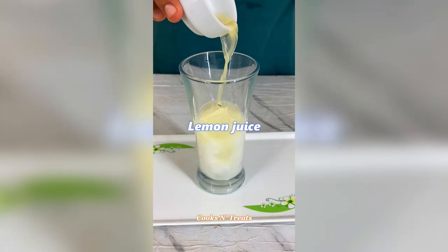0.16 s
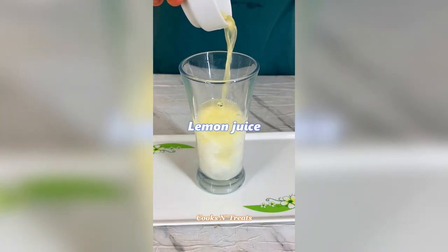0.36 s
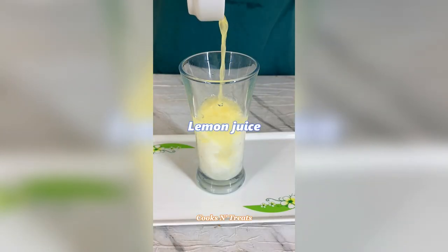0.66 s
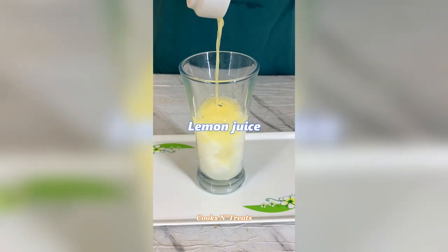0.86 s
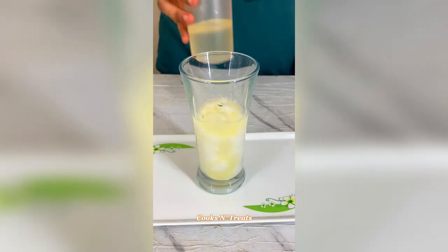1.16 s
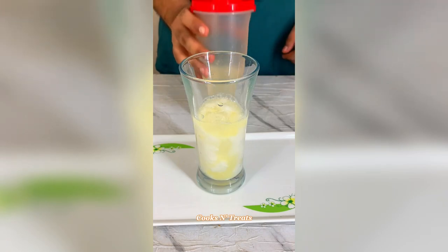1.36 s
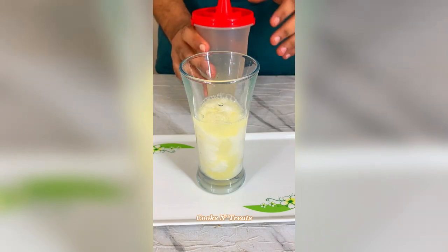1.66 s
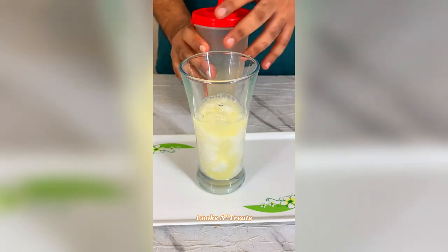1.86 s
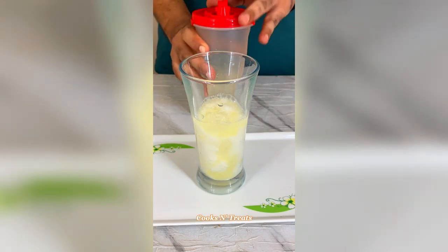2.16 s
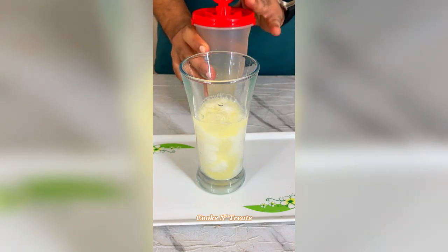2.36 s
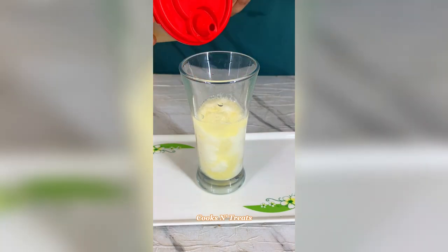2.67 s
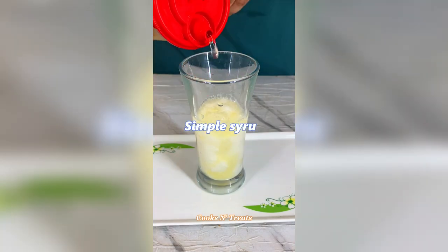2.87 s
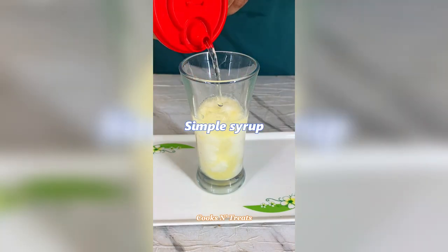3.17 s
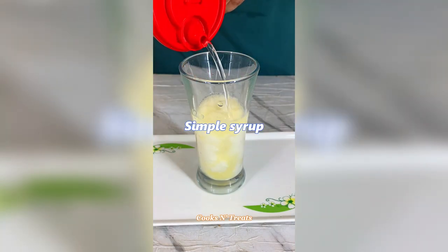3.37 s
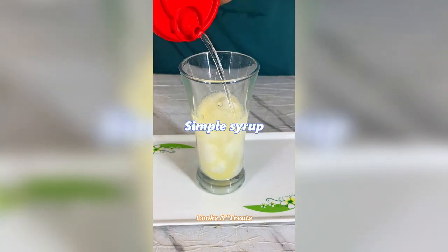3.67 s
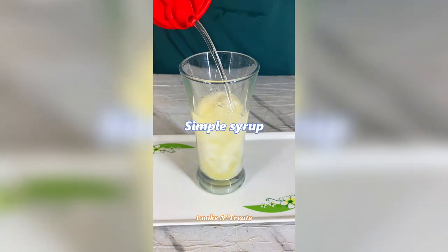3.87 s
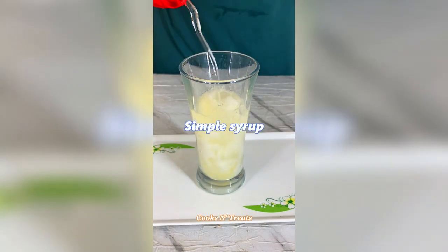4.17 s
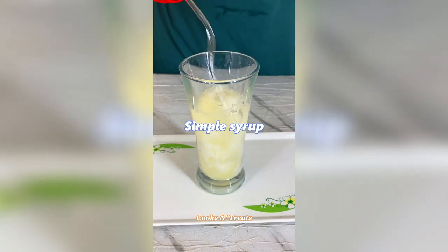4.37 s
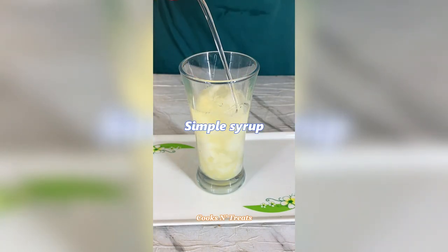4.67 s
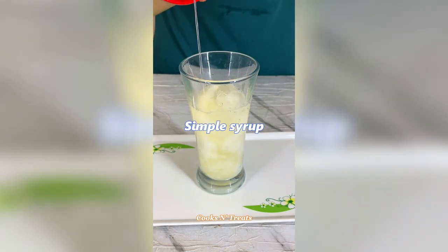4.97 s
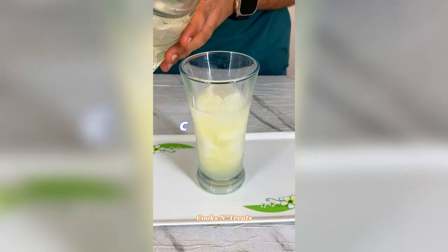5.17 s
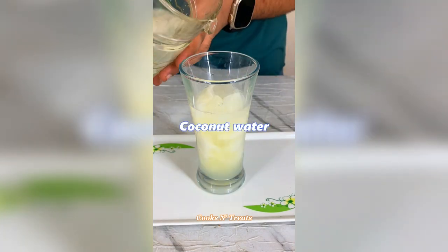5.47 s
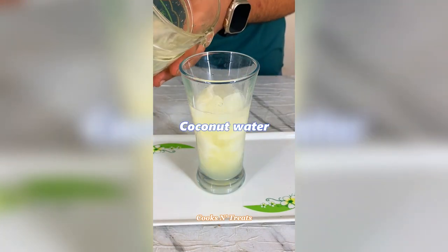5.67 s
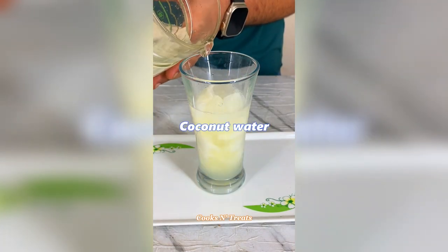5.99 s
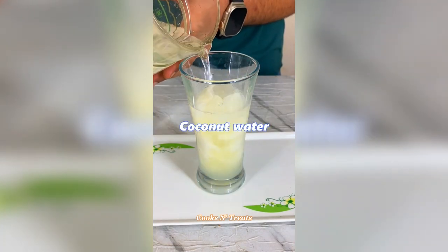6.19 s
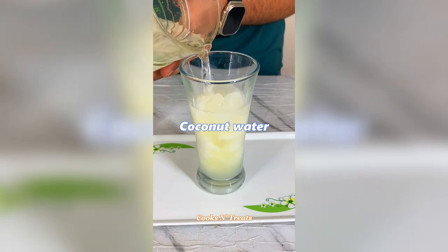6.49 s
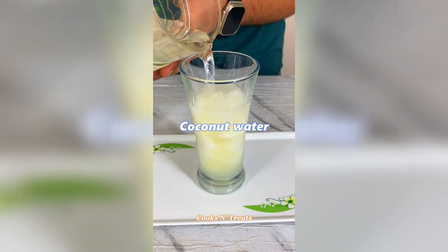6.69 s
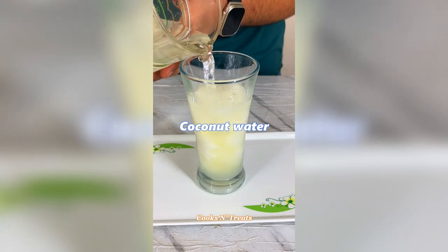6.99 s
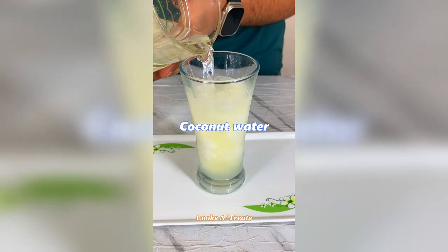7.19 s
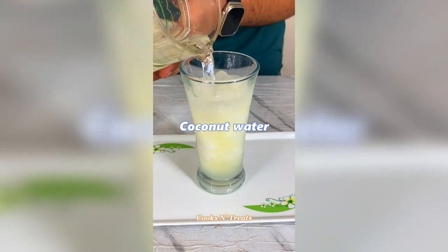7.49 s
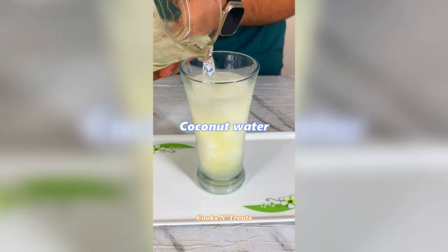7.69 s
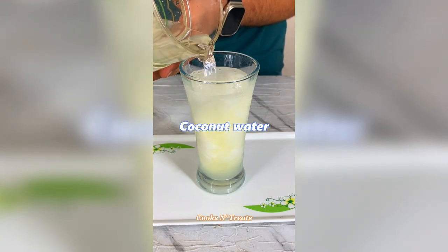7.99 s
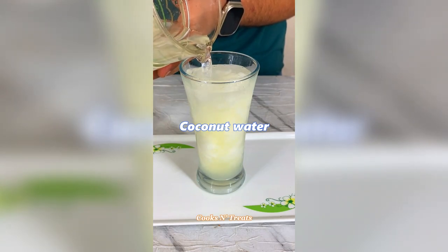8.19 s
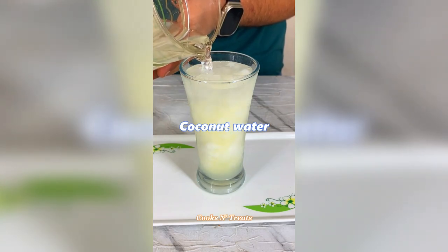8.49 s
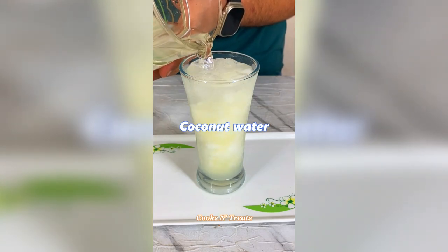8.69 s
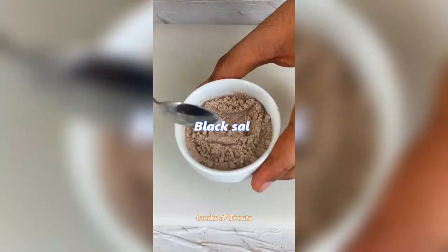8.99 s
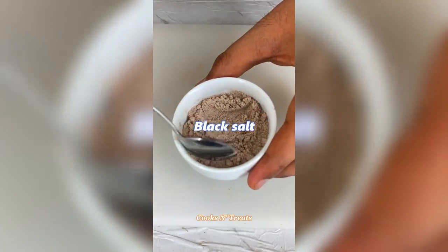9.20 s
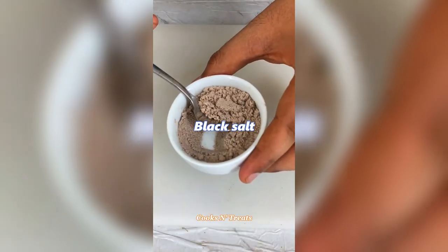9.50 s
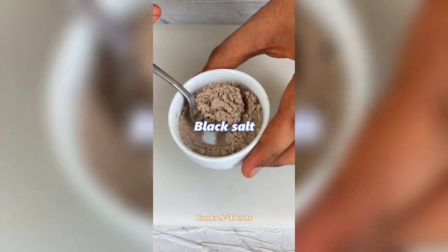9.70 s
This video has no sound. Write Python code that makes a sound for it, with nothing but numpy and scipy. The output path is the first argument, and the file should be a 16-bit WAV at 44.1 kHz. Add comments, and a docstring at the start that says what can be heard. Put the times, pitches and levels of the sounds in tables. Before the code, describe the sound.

Lemon juice gurgles onto ice in a glass, containers knock the table, faint syrup and coconut water trickles follow, then a spoon squeals on china.

```python
"""Lemon juice gurgles onto ice in a tall glass, then syrup and coconut water: ringing bubbles, splash and fizz.
Drops snap and ring in the glass, and containers knock on the table, setting off its modes and the room.
Shaped noise makes a quiet room with a thin high hiss. After a silence a steel spoon touches a china bowl
and squeals along its rim on gliding bending modes, digging into grains of salt."""
import sys
import numpy as np
from scipy import signal
from scipy.fft import rfft, irfft
from scipy.io import wavfile
from scipy.ndimage import uniform_filter1d

SR = 44100
rng = np.random.default_rng(int(sys.argv[2]) if len(sys.argv) > 2 else 0)


def waveform_to_disk(signal):
    """Save audio, clipped to [-1, 1], as 16-bit WAV at the path in sys.argv[1]."""
    frames = np.transpose(np.atleast_2d(signal))
    scaled = np.clip(frames, -1, 1) * 32767
    samples = np.round(scaled).astype(np.int16)
    wavfile.write(sys.argv[1], SR, samples)


N = 434385

# The pours as they run, before the overall trims. Each row: time in seconds, gurgle level in dB,
# spray level in dB, central bubble pitch in Hz.
LEMON_POUR = [(0, -61, -59, 1950), (0.14, -65.5, -58.5, 1600), (0.2, -51.5, -75, 1374),
              (0.37, -58, -69, 1073), (0.47, -64.5, -71, 2740), (0.72, -79.5, -79, 2430),
              (0.9, -104, -83, 3400), (1.15, -102, -86, 3020)]
SYRUP_POUR = [(3.7, -80, -84, 2950), (3.9, -77, -88, 2600), (4.02, -62, -86, 1790), (4.15, -74, -86, 3040),
              (4.36, -62, -80, 3320), (4.5, -71, -56, 2210), (4.68, -58.5, -58.5, 2000),
              (4.84, -86.5, -97, 2190), (5.1, -61.5, -80, 1906)]
COCONUT_POUR = [(6.4, -83, -91, 3480), (6.62, -70, -85, 2800), (7.0, -82, -85, 2140),
                (7.15, -70, -100, 2006), (7.8, -72, -73, 2400), (8.2, -87.5, -95, 2160),
                (8.5, -64, -89, 2580), (8.7, -70, -96, 2400), (8.9, -98, -96, 2384)]
# How each pour falls, in that order. Each row: ring of a bubble in cycles, splash in dB against the bubbles,
# drumming of the table in dB against the gurgle.
POUR_STREAMS = [(6, -1, -1), (6, 0.5, -2), (6.4, -3.5, -14)]
# Density of the trapped bubbles, one entry a pour, in bubbles per second.
POUR_BUBBLES_PER_S = (320, 130, 80)
# Colour of the fine spray, also of the snap of a drop. Each row: frequency in Hz, relative level in dB per Hz.
SPRAY_COLOUR = [(300, -17), (800, -6.5), (1600, -13.5), (3500, 3.5), (5500, 1.5), (7500, 2), (10500, -8.5),
                (12000, -38), (15000, -48)]


def pours():
    """Each stream traps small bubbles, splashes on the ice, throws a fine spray and drums the table."""
    gurgle, spray, drumming = np.zeros((2, N)), np.zeros((2, N)), np.zeros(N)
    t = np.arange(N) / SR
    fizz = colour(patter(per_s=200, spread_db=5.0), SPRAY_COLOUR)
    splash_colour = [(100, 1), (500, 9), (1500, 4), (4000, -8.5), (6000, -5), (12000, -36)]  # Hz, dB per Hz
    splash = colour(patter(per_s=400, spread_db=5.5), splash_colour)

    liquids = (LEMON_POUR, SYRUP_POUR, COCONUT_POUR)
    for rows, bubbles_per_s, character in zip(liquids, POUR_BUBBLES_PER_S, POUR_STREAMS):
        cycles, splash_db, drum_db = character
        s, body_db, spray_db, hz = np.transpose(rows)
        inside = (t > s[0]) & (t < s[-1])
        bubbles = bubble_stream(s, hz, bubbles_per_s, cycles)
        flow = amp(np.interp(t[inside], s, body_db))
        drumming[inside] = amp(drum_db) * flow
        gurgle[:, inside] += (unit(bubbles[:, inside]) + amp(splash_db) * splash[:, inside]) * flow
        spray += fizz * inside * amp(np.interp(t, s, spray_db))

    # the stream comes in uneven gulps
    gulp_hz, gulp_db = 14, 2.2
    gulps = amp(gulp_db * (unit(wander(N, gulp_hz).real) - 0.34))
    water = amp(-2) * in_glass(gurgle, ring_db=-13) + amp(-2) * spray
    # the falling stream drums the table through the glass
    drum = cluster(t, hz=160, width_hz=90) * drumming
    return echo(gulps * water + drum, wet_db=-5)


def bubble_stream(s, hz, bubbles_per_s, cycles, scatter=0.204):
    """Bubbles of random time, pitch, size and pan crowd around the pour's central pitch."""
    out = np.zeros((2, N))
    duration = s[-1] - s[0]
    for when, pitch, size, pan in rng.random((int(duration * bubbles_per_s), 4)):
        at = s[0] + when * duration
        bubble_hz = np.interp(at, s, hz) * np.exp(scatter * (4 * pitch - 2))
        ring = bubble(bubble_hz, cycles, rise=0.018)
        add(out, at, amp(23.7 * size) * np.outer([.5 + pan, 1.5 - pan], ring))
    return out


def bubble(hz, cycles, rise):
    """A trapped bubble rings briefly and rises in pitch as it nears the surface."""
    t = np.arange(2600) / SR
    age = t * hz / cycles
    pitch = hz * (1 + rise * np.minimum(age, 3))
    return np.sin(2 * np.pi * np.cumsum(pitch) / SR) * np.exp(-age)


def patter(per_s, spread_db):
    """Random clicks of uneven size fall a little to the left or right."""
    size = amp(spread_db * np.minimum(rng.exponential(1, N), 3.5))
    size = size * (rng.random(N) < per_s / SR)
    pan = 1 + np.outer([1, -1], rng.uniform(-0.18, 0.41, N))
    return size * rng.choice([-1, 1], N) * pan


# Notes of the air above the drink. Each row: frequency in Hz, relative level in dB,
# t60 in seconds for a drop (doubled under the pours).
GLASS_AIR = [(1580, -6.5, 0.18), (1910, -6, 0.095), (2954, -1, 0.052), (3820, 5.5, 0.022)]


def in_glass(x, ring_db):
    """The air above the drink keeps ringing with whatever splashes in it."""
    t = np.arange(8000) / SR
    ring = 0
    for hz, db, t60 in GLASS_AIR:
        ring = ring + amp(db - 60 * t / (2 * t60)) * cluster(t, hz, 0.061 * hz)
    return x + amp(ring_db) * signal.oaconvolve(x, ring[None] / np.linalg.norm(ring))[:, :N]


# The clearest drops, bubbles and cracks of ice in the glass, before the overall trim. Each row: start in seconds,
# ring pitch in Hz, ring level in dB, snap level in dB.
GLASS_DROPS = [(0.051, 3480, -61, -65), (0.084, 1495, -50, -60), (0.136, 1410, -55.5, -58),
               (0.153, 1530, -46, -61), (0.163, 1467, -39.5, -57.5), (0.178, 1400, -42, -75),
               (0.229, 1435, -55, -57.5), (0.251, 1100, -49, -68), (0.3303, 1330, -55, -62.5),
               (0.358, 1096, -58, -56), (0.447, 4380, -61, -65), (0.5304, 3100, -64, -61),
               (0.618, 3720, -61.5, -80), (0.641, 3280, -67, -65), (0.706, 2630, -66.5, -78),
               (0.8893, 4800, -55.5, -60.5), (4.048, 1690, -64, -69), (4.119, 3970, -59, -69),
               (4.1844, 3560, -58, -47.5), (4.257, 3870, -50.5, -56), (4.3284, 3540, -53.5, -62),
               (4.3697, 3920, -54, -68), (4.4377, 5430, -56, -68), (4.5398, 3810, -55, -52.5),
               (4.569, 5200, -65, -55), (5.009, 1905, -53, -81), (5.0674, 1790, -55.5, -66),
               (5.0877, 1550, -56, -59.5), (6.403, 4030, -64.5, -74), (6.8029, 2120, -66, -76),
               (6.8373, 1590, -61.5, -69), (7.019, 6630, -62, -82), (7.102, 1824, -61, -73),
               (7.1693, 1670, -58, -69), (7.3177, 1894, -60, -75.5), (7.494, 1590, -63, -86),
               (7.657, 2710, -68.5, -73), (7.7267, 3536, -64, -72), (8.4876, 4330, -62, -67),
               (8.692, 2450, -61, -79)]


def drops():
    """Each drop or crack is a snap, a rough little ring, a dull plop and the note of the air in the glass."""
    out, t = np.zeros((2, N)), np.arange(12000) / SR
    snap_s, ring_s, plop_s = 0.0028, 0.0047, 0.015  # decay times
    plop_colour = [(60, -18), (200, 6), (900, -3), (2000, -13), (5000, -40)]  # Hz, dB per Hz
    for s, hz, ring_db, snap_db in GLASS_DROPS:
        snap = colour(pair(len(t), 0.2), SPRAY_COLOUR) * np.exp(-t / snap_s) * (1 - np.exp(-t / 0.00019))
        ring = cluster(t, hz, 0.11 * hz) * np.exp(-t / ring_s) * (1 - np.exp(-t / 0.00079))
        plop = colour(pair(len(t), 0.43), plop_colour) * np.exp(-t / plop_s) * (1 - np.exp(-t / 0.0011))
        glass = 0
        for glass_hz, db, t60 in GLASS_AIR:
            detuned_hz = glass_hz * rng.uniform(0.92, 1.04)
            glass = glass + amp(db - 60 * t / t60) * np.sin(2 * np.pi * detuned_hz * t)
        drop = at_level(snap, snap_db) + at_level(ring, ring_db)
        drop = drop + at_level(plop, ring_db - 15) + at_level(glass, ring_db - 17)
        add(out, s, echo(drop, wet_db=-1))
    return out * amp(-2)


# Blows on the table and its containers. Each row: start in seconds, level in dB before the band balance,
# tilt in dB from one band to the next higher, extra middle in dB of a hollow container, its low ring in Hz,
# low ring level in dB, its high ring in Hz, high ring level in dB, length as a factor on the decay.
TABLE_BLOWS = [(1.4929, -22, -6.6, 1, 429, -8, 1180, -15, 0.99),
               (2.1293, -44, -10, -2, 696, -3, 2520, 0, 1), (2.19, -62, 0.5, 0, 700, -8, 2600, -8, 1),
               (2.244, -37, .5, 4, 1000, 3, 3560, -8, 0.82), (2.307, -44.5, -8, 5, 345, 2, 1833, -3, .85),
               (4.459, -46, 0.5, -2, 898, -4, 1530, 1.5, 0.92),
               (4.618, -52.5, 1.7, 0, 1553, -3, 2890, 1, 0.75),
               (4.721, -62, -1, 10, 1515, -2, 3000, 3, 1.1),
               (6.0592, -49.5, -10.5, 1, 499, -3, 1503, -9, 0.79),
               (6.867, -47, -10.5, -1, 492, -3, 1553, -9, 0.88),
               (7.9622, -57, -11.5, 1, 490, -3, 1506, -12, .75)]
# The table's modes. Each row: frequency in Hz, relative level in dB, t60 in seconds before the length factor.
TABLE_MODES = [(55.3, -24, 1.3), (72, -24, 0.17), (92.66, -16, .85), (128, -17, .25), (144, -18.5, 0.53),
               (162.2, -9.5, 0.52), (218.7, -19.5, .55), (297, -15.5, .32), (346.5, -17.5, .37),
               (433.5, -12, .17), (494, -12, .3), (541, -21, .16), (796, -17.5, 0.18), (1083, -18, 0.074),
               (1496, -23.5, .25), (1605.4, -24, .2), (2480, -26, 0.12), (3270, -25, .16)]
# Colour of the burst of a blow. Each row: frequency in Hz, relative level in dB per Hz.
THUD_COLOUR = [(30, -32), (55, -10), (130, 1.5), (250, -6), (450, 0.5), (1000, -5), (2000, -13),
               (5000, -18.5), (7300, -34), (8500, -39.5), (11000, -46), (13000, -71.5)]
# Balance of an untilted blow, in dB: bass, low-mid, high-mid, treble.
BLOW_BALANCE = [-1.87, 2.5, 1.5, -3]


def knocks():
    """A blow is a short crack, the container's ring, the table's modes and the room's answer."""
    out, t = np.zeros((2, N)), np.arange(SR) / SR
    crack_s, ring_t60, width = .003, 0.2, 0.17  # s, s, ring width as a share of its pitch
    for s, level_db, tilt_db, hollow_db, low_hz, low_db, high_hz, high_db, length in TABLE_BLOWS:
        burst = colour(pair(SR, side=0.53), THUD_COLOUR)
        table = 0
        for hz, db, t60 in TABLE_MODES:
            mode = amp(db - 60 * t / (t60 * length)) * np.sin(2 * np.pi * hz * t)
            table = table + mode * rng.choice([-1, 1])
        container = amp(low_db) * cluster(t, low_hz, width * low_hz)
        container = container + amp(high_db) * cluster(t, high_hz, width * high_hz)

        # the louder the blow, the smaller its crack beside the body
        crack = amp(-17 - 0.3 * level_db) * burst * np.exp(-t / crack_s)
        blow = die_away(burst, length) + crack
        # the heavy table takes a few milliseconds to get moving
        blow = blow + amp(9) * table * (1 - np.exp(-t / 0.0063))
        blow = blow + container * amp(-60 * t / (ring_t60 * length))

        tilt = tilt_db * (np.arange(4) - 1.5)
        hollow = hollow_db * np.array([0, 1, 1, 0])
        band_db = level_db + tilt + hollow + BLOW_BALANCE
        add(out, s, weigh(blow * np.minimum(t / 0.00077, 1), band_db, size=1300))
    return out * amp([[-1.1], [1.1]])


# Crossovers between the four bands of a blow, in Hz.
BLOW_CROSSOVERS = [400, 1500, 5000]


def weigh(x, band_db, size):
    """Sets the strength of a blow's bass, low-mid, high-mid and treble over its first samples."""
    out = 0
    for edge, db in zip(BLOW_CROSSOVERS + [None], band_db):
        band = x
        if edge:
            low = signal.butter(5, edge, "low", fs=SR, output="sos")
            high = signal.butter(5, edge, "high", fs=SR, output="sos")
            band, x = signal.sosfilt(low, x), signal.sosfilt(high, x)
        out = out + amp(db) * band / np.sqrt(np.mean(band[:, :size] ** 2))
    return out


# The spoon slides out along the rim and part of the way back. Each row: time in seconds,
# place of the contact on its neck from 0 to 1.
SPOON_SLIDE = [(9.385, 0.02), (9.44, 0.15), (9.48, 0.45), (9.535, .89), (9.565, 0.98), (9.59, .89),
               (9.635, 0.45), (9.672, 0.24)]
# How hard the spoon rubs. Each row: time in seconds, level of its upper modes in dB.
SPOON_PRESS = [(9.385, -75), (9.405, -46), (9.48, -29.5), (9.535, -13), (9.585, -30.5), (9.615, -18),
               (9.672, -27)]
# Upper modes. Each row: Hz at place 0, Hz at place 1, width in Hz, relative level in dB.
SPOON_UPPER = [(6350, 7480, 240, -2), (7670, 8150, 130, 1.5), (9850, 10250, 380, -12),
               (11200, 11350, 93, 2), (13900, 13750, 450, -6.5), (14800, 14900, 500, -18)]
# Colour of the grinding salt. Each row: frequency in Hz, relative level in dB per Hz.
SALT_COLOUR = [(40, -13.5), (250, -4), (700, -6.5), (1100, -3), (2200, -2), (3100, -9.5), (4700, 6),
               (5300, 1), (6000, -18.5), (7000, -6.5), (8000, -2), (9200, -13), (10400, -11), (11300, 1),
               (12900, -18), (13900, -7), (15000, -13.5), (16500, -32)]
# Lumps of salt giving way. Each row: time in seconds, level in dB.
SALT_CRUNCHES = [(9.504, -21), (9.565, -33), (9.635, -26), (9.67, -29)]
# The china ringing under the spoon. Each row: frequency in Hz, peak amplitude in dB before its swell.
CHINA_BOWL = [(3760, -29.5), (6250, -54)]


def spoon():
    """A damped tap, then the squealing slide with salt grains grinding beneath it."""
    out, t = np.zeros((2, N)), np.arange(9.38, 9.7, 1 / SR)
    touch_s, stop_s = 9.3708, 9.6725
    slide = np.interp(t, *np.transpose(SPOON_SLIDE))
    slide = np.maximum(uniform_filter1d(slide, size=500), 0)
    # the squeal grows as the steel bites
    bite_db = np.interp(t, [9.39, 9.408], [-27, 0])

    upper = 0
    for near_hz, far_hz, width_hz, db in SPOON_UPPER:
        pitch = near_hz + (far_hz - near_hz) * slide
        turn = np.exp(2j * np.pi * np.cumsum(pitch) / SR)
        upper = upper + amp(db) * (wander(len(t), width_hz) * turn).real
    upper = signal.sosfilt(signal.butter(3, 5500, "high", fs=SR, output="sos"), upper)
    upper = close_stereo(unit(upper), right_db=0.5, lag_ms=.03)
    upper = upper * amp(np.interp(t, *np.transpose(SPOON_PRESS)))

    grains = pair(len(t), 0.17) * amp(2.8 * wander(len(t), 500).real)
    crunch_s = 0.011
    crunch = sum(amp(db) * np.exp(-((t - s) / crunch_s) ** 2) for s, db in SALT_CRUNCHES)
    grit = colour(grains, SALT_COLOUR) * (amp(-36 + bite_db) + crunch)

    china = sum(amp(db) * np.sin(2 * np.pi * hz * t) for hz, db in CHINA_BOWL)
    china = china * np.interp(t, [9.49, 9.525, 9.57, 9.61], [0.046, 1, 0.67, 0.086])
    stop = amp(np.interp(t, [stop_s, stop_s + 0.001, stop_s + 0.025], [0, -38, -70]))
    stop = stop * signal.windows.tukey(len(t), .03)
    add(out, t[0], (spoon_modes(t, slide, bite_db) + upper + grit + china) * stop)
    add(out, touch_s, spoon_tap())
    return out


def spoon_tap(peak_s=0.0013):
    """The first touch is a few steel partials and noise under one swift swell and fall."""
    age = np.arange(600) / SR
    partials = [(2200, -3), (4200, 0.5), (9900, -8), (11100, -1.0), (13900, -24)]  # Hz, dB
    tap = sum(amp(db) * np.sin(2 * np.pi * hz * age) for hz, db in partials)
    tap = close_stereo(tap, right_db=1, lag_ms=0.057) + .5 * pair(len(age), 0.49)
    return amp(-25) * tap * age / peak_s * np.exp(1 - (age / peak_s) ** 2 / 2)


# The spoon's three lowest bending modes. Each row: Hz at place 0, Hz at place 1, bow of the glide as an exponent,
# sag in Hz per second as it digs in, base level in dB, place where the mode sings best, reach of that place,
# gain there going out in dB, gain there coming back in dB.
SPOON_BENDS = [(2093, 1080, .44, -1180, -36.5, 0.43, 0.12, 17, 19),
               (2190, 2730, .95, -480, -25.5, 0.61, 0.31, 19, 6.5),
               (4000, 5100, 0.99, 2, -26.5, 0.54, 0.32, 6, 22)]


def spoon_modes(t, slide, bite_db, jitter_hz=12):
    """The sliding contact retunes the bending modes; stick and slip makes each sing as its best place passes."""
    out, going_out = 0, t < t[np.argmax(slide)]
    # one entry a mode: base roughness, level of right over left in dB, lag of the right in ms
    voicing = [(.45, 1, .06), (.15, 5, .115), (.15, 4.5, .052)]
    for mode, (rough, right_db, lag_ms) in zip(SPOON_BENDS, voicing):
        near_hz, far_hz, bow, sag_hz_per_s, db, best, reach, out_db, back_db = mode
        pitch = near_hz + (far_hz - near_hz) * slide ** bow + sag_hz_per_s * (t - t[0])
        pitch = pitch + jitter_hz * wander(len(t), 200).real
        nearness = np.exp(-((slide - best) / reach) ** 2)
        level_db = db + bite_db + np.where(going_out, out_db, back_db) * nearness
        # a strongly driven mode locks into a purer tone
        share = rough + np.interp(level_db, [-28, -12], [.4, .08])
        flutter = np.sqrt(1 - share ** 2) + share * wander(len(t), 200)
        turn = np.exp(2j * np.pi * np.cumsum(pitch) / SR)
        tone = unit((flutter * turn).real) * amp(level_db)
        out = out + close_stereo(tone, right_db, lag_ms)
    return out


def close_stereo(x, right_db, lag_ms):
    """A close source arrives earlier in the left channel and louder in the right."""
    fine = signal.resample_poly(x, 4, 1)  # four times finer, for a lag of a few samples
    place = np.arange(len(fine))
    late = np.interp(place[::4] - lag_ms * SR * 4 / 1000, place, fine)
    return np.array([x, late]) * unit(amp([[-right_db / 2], [right_db / 2]]))


# Colour of the low room noise. Each row: frequency in Hz, relative level in dB per Hz.
AIR_COLOUR = [(15, -35), (25, -13), (96, 0.5), (119, -6), (158, -2.5), (245, -13), (370, -6.5), (460, -14),
              (651, -19), (774, -21), (1120, -25), (1590, -34.5), (4500, -44), (5850, -73), (9900, -120)]
# Steps of the room noise, on top of its base level. Each row: start in seconds, level in dB.
AIR_LEVELS = [(0, 11.5), (1.169, 5), (2.72, 10), (5.11, 4.5)]
# Colour of the thin hiss. Each row: frequency in Hz, relative level in dB per Hz.
HISS_COLOUR = [(3000, -36), (5400, -28), (5850, -8), (6300, 4), (6650, 0.5), (6900, -10.5), (7200, -27.5),
               (8500, -35.5), (10000, -25), (11500, -38)]
# Bouts of faint high chirring. Each row: start in seconds, end in seconds, level in dB before the throb.
CHIRR_BOUTS = [(2.71, 3.483, -65.5), (5.503, 6.62, -81), (8.78, 8.974, -77.5)]


def room_tone():
    """Low noise in level steps, a thin hiss that partly follows them and faint throbbing chirrs; all end by 8.965 s."""
    t = np.arange(N) / SR
    since, step_db = np.transpose(AIR_LEVELS)
    level_db = uniform_filter1d(step_db[np.searchsorted(since[1:], t)], size=600)
    air = colour(pair(N, 0.45), AIR_COLOUR) * amp(-68 + level_db)
    hiss = amp(-72 + .35 * level_db) * colour(pair(N, .8), HISS_COLOUR)
    out = air + hiss
    chirr_colour = [(4200, -45), (4800, -10.5), (5400, -6), (6200, -12), (7000, -36)]  # Hz, dB per Hz
    chirr = colour(pair(N, 0.19), chirr_colour)
    throb_s = 0.228
    for start, end, db in CHIRR_BOUTS:
        throb = abs(np.sin(np.pi * (end - t) / throb_s)) ** 0.5
        out += amp(db) * chirr * ((t > start) & (t < end)) * throb
    return out * np.interp(t, [8.955, 8.965], [1, 0])


# Decay of the room. Each row: frequency in Hz, t60 in seconds before any length factor.
ROOM_DECAY = [(60, 0.71), (160, .45), (420, .36), (1100, 0.23), (2900, 0.21), (7700, 0.3)]


def die_away(x, length=1):
    """Lets each frequency decay as it does in the room."""
    hz, t, z = signal.stft(x, SR, nperseg=512)
    t60 = length * read(ROOM_DECAY, hz)[:, None]
    return signal.istft(z * amp(-60 * t / t60), SR, nperseg=512)[1][:, :x.shape[1]]


def echo(x, wet_db):
    """Adds the kitchen's reverberation, decaying noise after a short gap, to a stereo sound."""
    tail = die_away(pair(16000, 0.77))
    tail[:, :130] = 0
    wet = signal.fftconvolve(x, tail / np.linalg.norm(tail[0]), axes=1)
    return x + amp(wet_db) * wet[:, :x.shape[1]]


def cluster(t, hz, width_hz):
    """A crowd of close modes about one frequency, at rms 1."""
    return unit((wander(len(t), width_hz) * np.exp(2j * np.pi * hz * t)).real)


def wander(size, width_hz):
    """A complex random envelope of rms 1, as of a steep-sided resonance of this width."""
    z = rng.standard_normal((size + 2000, 2)) @ [1, 1j]
    r = np.exp(-np.pi * width_hz / SR)
    z = signal.lfilter([1], [1, -2 * r, r * r], z)[2000:]
    return z / np.sqrt(np.mean(abs(z) ** 2))


def pair(size, side):
    """Stereo white noise whose channels differ by the share side."""
    mid, diff = rng.standard_normal((2, size))
    return unit(np.array([mid + side * diff, mid - side * diff]))


def colour(x, spectrum):
    """Gives a sound a spectrum, at rms 1."""
    size = x.shape[-1]
    gain = amp(read(spectrum, np.fft.rfftfreq(size, 1 / SR)))
    return unit(irfft(rfft(x) * gain, size))


def read(points, hz):
    """Reads a table along a logarithmic frequency axis."""
    f, value = np.transpose(points)
    return np.interp(np.log(hz + 1), np.log(f + 1), value)


def at_level(x, db, size=1300):
    """Sets the level of a short sound over its first samples."""
    return amp(db) * x / np.sqrt(np.mean(x[..., :size] ** 2))


def amp(db):
    """Turns dB into an amplitude factor."""
    return 10 ** (np.asarray(db) / 20)


def unit(x):
    """Scales to rms 1."""
    return x / np.sqrt(np.mean(x ** 2) + 1e-24)


def add(mix, s, sound):
    """Adds a sound to the stereo mix at time s."""
    part = mix[:, max(round(s * SR), 0):][:, :sound.shape[-1]]
    part += sound[..., :part.shape[1]]


def scene():
    """The three pours with their drops, the knocks and the spoon over the room tone."""
    # the sound of the drink and its echo is cut dead at 5.11 s, and is let in again by 5.6 s
    heard = np.interp(np.arange(N) / SR, [5.104, 5.11, 5.5, 5.6], [1, 0, 0, 1])
    drink = (pours() + drops()) * heard
    room = room_tone() * amp([[-.8], [.8]])
    return drink + knocks() + spoon() + room


def record(dry):
    """Clips at full scale, then cuts the treble above 15.75 kHz."""
    low_pass = signal.firwin(401, 15750, window=("kaiser", 9), fs=SR)
    return signal.oaconvolve(np.clip(dry, -1, 1), low_pass[None], "same")


dry = scene()
out = record(dry)
waveform_to_disk(out)
```